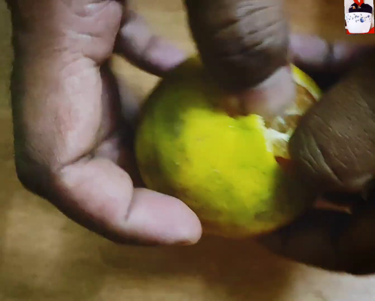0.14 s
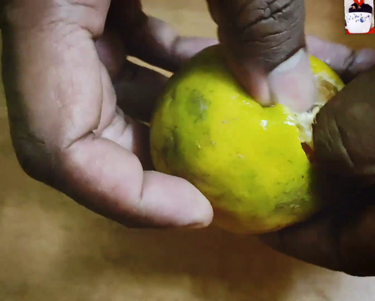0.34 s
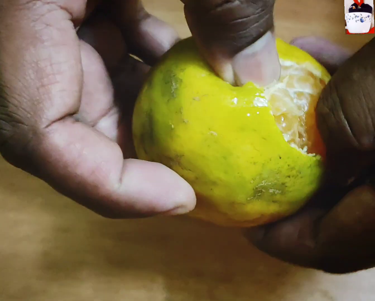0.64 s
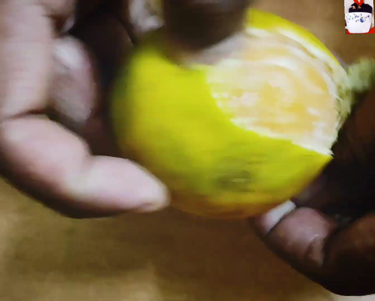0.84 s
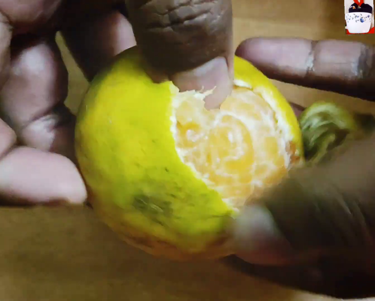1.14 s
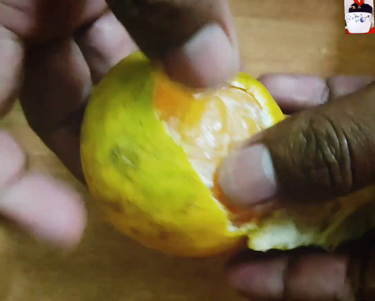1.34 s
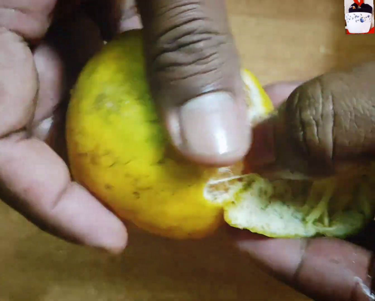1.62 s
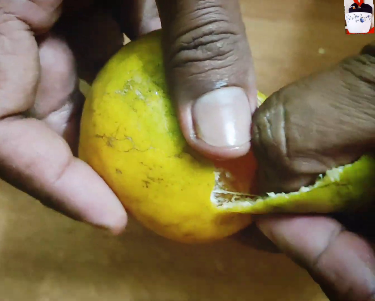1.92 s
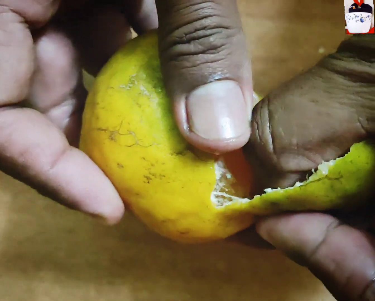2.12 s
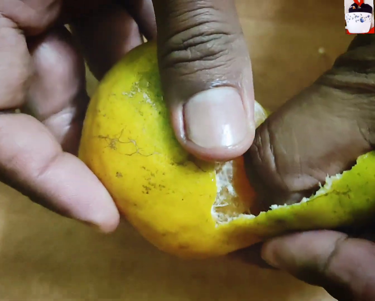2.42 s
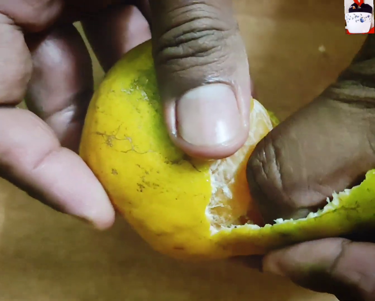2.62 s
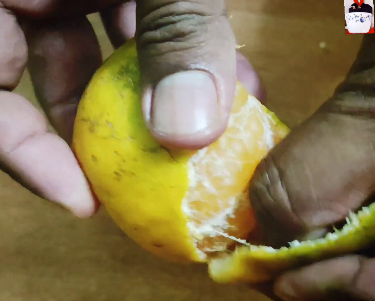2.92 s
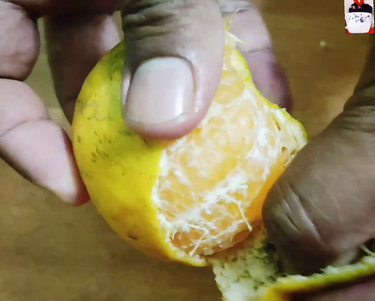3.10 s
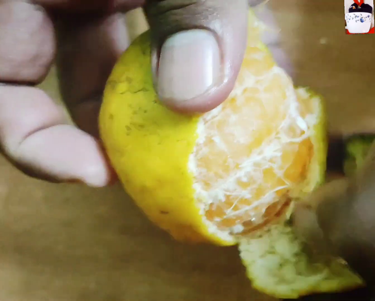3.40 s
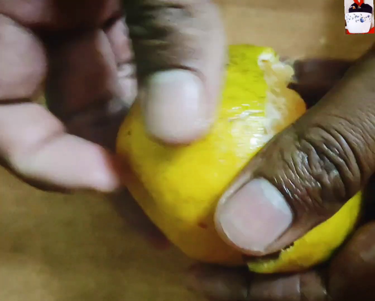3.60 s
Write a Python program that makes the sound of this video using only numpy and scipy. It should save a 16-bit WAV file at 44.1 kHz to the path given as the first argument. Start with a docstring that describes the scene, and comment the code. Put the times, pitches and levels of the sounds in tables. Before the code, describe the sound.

Rind pulled off an orange, close stereo microphone slightly favouring the left: faint rubbing first, small snaps, a brief dense tear midway, then grainy peeling with sharp ticks and a low hum.

```python
"""A low rumble and faint air come first, then fingers rub and press an orange with faint squeaks.
Pith fibres snap as single clicks with scatter, and the rind rips once in a dense, resonant crackle.
Then a strip pulls away as fine fizzing grains with sharp ticks, while a low sine hum swells.
Rubs are grainy noise, bumps are damped rings of fruit and hand, and a short room tail follows them all."""
import sys
import numpy as np
from scipy import signal
from scipy.fft import rfft, irfft, next_fast_len
from scipy.io import wavfile
from scipy.ndimage import map_coordinates

SR = 44100
rng = np.random.default_rng(int(sys.argv[2]) if len(sys.argv) > 2 else 0)


def output_pcm(signal):
    """Save a mono or channel-first signal as 16-bit PCM at the path in sys.argv[1].

    Samples are clipped to [-1, 1] before scaling.
    """
    pcm = np.clip(np.atleast_2d(signal).T, -1, 1) * 32767
    wavfile.write(sys.argv[1], SR, np.round(pcm).astype(np.int16))


N = 165375  # samples


def amp(db):
    """Decibels to gain."""
    return 10 ** (np.asarray(db) / 20)


def unit(x):
    """Scale to rms 1."""
    return x / np.sqrt(np.mean(x ** 2) + 1e-20)


def along(points, hz):
    """Read (frequency, value) points on a log frequency axis."""
    f, v = np.transpose(points)
    return np.interp(np.log(hz + 1), np.log(f + 1), v)


def level(rows):
    """Gain per sample from (time, level) rows, silent before and after."""
    s, db = np.transpose(rows)
    return amp(np.interp(np.arange(N) / SR, s, db, left=-np.inf, right=-np.inf))


def swell(centre, half):
    """A bell-shaped rise and fall; centre and half length in seconds."""
    return np.exp(-((np.arange(N) / SR - centre) / half) ** 2)


def wobble(rate):
    """A smooth random curve, rate knots a second."""
    knots = rng.standard_normal(int(N * rate / SR) + 4)
    return map_coordinates(knots, [np.arange(N) * rate / SR])


def filtered(x, response):
    """Shape x by a response of frequency."""
    m = next_fast_len(N + SR // 2)
    hz = np.fft.rfftfreq(m, 1 / SR)
    return irfft(rfft(x, m) * response(hz), m)[..., :N]


def coloured(pair, spectrum, alike, tilt_db=0):
    """Two unrelated signals become one stereo sound of rms 1; tilt is in dB per octave."""
    def response(hz):
        gain = amp(along(spectrum, hz) + tilt_db * np.log2(hz + 1))
        # the mid-side balance sets how alike left and right are
        turn = np.arccos(np.clip(along(alike, hz), -1, 1)) / 2
        return gain * [np.cos(turn), np.sin(turn)]

    mid, side = filtered(pair, response)
    return unit(np.array([mid + side, mid - side]))


def noise():
    """Two unrelated white noises."""
    return rng.standard_normal((2, N))


def grains(rate, spread_db, hiss):
    """Tiny ruptures at random moments, rate a second, sizes varied by spread_db, on a bed of hiss."""
    sizes = amp(spread_db * np.clip(rng.standard_normal(N), -2, 2))
    happens = rng.random(N) < rate / SR
    return unit(sizes * happens * noise()) + hiss * noise()


SNAP_TILT_DB = 0.2  # per octave


def pulse(hz, octaves, size=1024):
    """A causal minimum-phase click of peak 1 with a bell-shaped spectrum."""
    f = np.fft.rfftfreq(size, 1 / SR) + 1
    bell = np.exp(-(np.log2(f / hz) / (2 * octaves)) ** 2)
    gain = bell * amp(SNAP_TILT_DB * np.log2(f / hz + .5))
    # folding the cepstrum forward packs the energy at the start
    cepstrum = irfft(np.log(gain + .003))
    cepstrum[1:size // 2] *= 2
    cepstrum[size // 2:] = 0
    click = irfft(np.exp(rfft(cepstrum)))
    return click / np.abs(signal.hilbert(click)).max()


# fibres snapping: (time [s], click level before SNAP_DB [dB], centre [Hz], width [octaves])
FIBRE_SNAPS = [(1.3047, -42, 5100, 1.3), (1.6497, -44, 1510, 0.57), (1.6537, -44.5, 1570, 0.48),
               (1.7118, -37.5, 2630, 0.63), (1.7166, -30.5, 3070, 2.5), (1.7203, -41, 1960, 0.73),
               (1.8331, -29, 4400, 3.3), (1.8356, -36, 5100, 0.93), (1.84, -31, 5530, 0.94),
               (2.1631, -35.5, 2540, 1.42), (2.2649, -34.5, 3750, 1.4), (2.3136, -31, 2980, 0.93),
               (2.3261, -32, 7800, 0.33), (2.3502, -34, 1900, 0.24), (2.359, -20, 2240, 0.55),
               (2.3605, -45, 1920, 0.34), (2.3613, -16, 2100, 0.64), (2.3671, -21.5, 2160, 1.6),
               (2.3789, -18.5, 2200, 0.97), (2.3878, -10.5, 3700, 1.8), (2.397, -12.5, 2760, 2.9),
               (2.4061, -19, 3400, 2.7), (2.418, -26, 2430, 0.92), (2.4198, -22.5, 3420, 1.07),
               (2.5361, -40.5, 1640, 0.48), (2.7316, -34, 3730, 2.5), (2.7428, -32.5, 3320, 2.5),
               (2.7582, -28.5, 4440, 4), (3.1499, -48, 3140, 0.33), (3.2054, -36.5, 5000, 0.36),
               (3.2339, -26.5, 5860, 1.05), (3.2716, -37.5, 2960, 0.46), (3.2768, -23.5, 2540, 0.82),
               (3.3053, -36.5, 3700, 0.9), (3.3329, -28.5, 4770, 0.64), (3.4268, -13, 6000, 1.33),
               (3.4622, -31.5, 3340, 0.59), (3.5098, -35.5, 2500, 0.99), (3.5859, -34, 3430, 0.82),
               (3.6056, -35, 2700, 1.3), (3.651, -34, 2700, 0.69), (3.7075, -26, 3170, 0.61),
               (3.7244, -38, 3550, 0.36)]
SNAP_DB, SNAP_LEAD_S = 2, .0001  # added strength of every snap; start ahead of the listed time
SCATTER_DB, SCATTER_T60_S = -3.5, .006  # bounces between hands and fruit


def snaps():
    """Each fibre breaks with one click, followed by a few milliseconds of scatter."""
    out, t = np.zeros((2, N + SR)), np.arange(SR // 40) / SR
    for s, db, hz, octaves in FIBRE_SNAPS + small_fibres():
        # scatter waits 0.3 ms, and each side hears some of the other
        paths = rng.standard_normal((2, len(t))) * amp(-60 * t / SCATTER_T60_S) * (t > .0003)
        paths = paths + paths[::-1] / 2
        paths *= amp(SCATTER_DB) / np.linalg.norm(paths, axis=1, keepdims=True)
        paths[:, 0] = 1  # the direct click
        sound = signal.fftconvolve(paths, pulse(hz, octaves)[None], axes=1)
        start = round((s - SNAP_LEAD_S) * SR)
        out[:, start:start + sound.shape[1]] += amp(db + SNAP_DB) * sound
    return out[:, :N]


# the rind tearing: (time [s], level [dB])
RIP_LEVEL = [(2.295, -63.5), (2.322, -52), (2.342, -46.5), (2.361, -28), (2.373, -41), (2.39, -37.5),
             (2.417, -44.5), (2.432, -50.5), (2.48, -75)]
# resonances of the rind: (frequency [Hz], relative level [dB])
RIND_COLOUR = [(100, -4), (250, -14.5), (570, -6.5), (850, -14), (1250, -14.5), (1670, -1.5), (1950, -3),
               (2270, -4), (2900, -9), (3700, -12.5), (4040, -7.5), (4700, -15.5), (5700, -8.5),
               (7500, -10.5), (11000, -21.5)]
# stereo width of rip, pith and rubs: (frequency [Hz], left-right likeness [1 = same])
FRUIT_ALIKE = [(100, 1), (1500, 0.83), (3000, 0.53), (5000, 0.31), (10000, 0.07)]
RIP_OPEN_S, RIP_OPENING_S, RIP_DULL_DB = 2.358, 0.0068, -3  # moment, speed; slope per octave before


def rip():
    """The rind tears through: a dense crackle in its own resonances, muffled until the tear opens."""
    crackle = grains(2500, spread_db=0.0, hiss=0.66)
    opened = (1 + np.tanh((np.arange(N) / SR - RIP_OPEN_S) / RIP_OPENING_S)) / 2
    bright = coloured(crackle, RIND_COLOUR, FRUIT_ALIKE)
    dull = coloured(crackle, RIND_COLOUR, FRUIT_ALIKE, tilt_db=RIP_DULL_DB)
    return level(RIP_LEVEL) * (opened * bright + (1 - opened) * dull)


# the strip pulling away: (time [s], level [dB])
PEEL_LEVEL = [(3.08, -70), (3.16, -63), (3.22, -58.5), (3.3, -55.5), (3.45, -58.5), (3.62, -56.5),
              (3.69, -59.5), (3.75, -56)]
# pith giving way briefly: (centre [s], half length [s], level [dB])
PITH_GIVES = [(1.623, 0.031, -61.5), (1.684, 0.041, -61), (1.713, 0.0044, -51), (1.841, 0.026, -56.5),
              (1.935, 0.021, -62.5), (2.588, 0.031, -61.5), (2.901, 0.073, -62.5)]
# colour of parting pith: (frequency [Hz], relative level [dB])
PITH_COLOUR = [(200, 2.5), (800, -3), (1250, -0.5), (3500, 1.5), (9000, -1), (11000, -4)]


def pith():
    """Pith parts from the flesh as grainy noise: short gives, then one long fizzing pull."""
    gives = sum(amp(db) * swell(s, half) for s, half, db in PITH_GIVES)
    short = gives * coloured(grains(900, spread_db=0, hiss=1), PITH_COLOUR, FRUIT_ALIKE)
    fizz = coloured(grains(1000, spread_db=0, hiss=1), PITH_COLOUR, FRUIT_ALIKE)
    return short + level(PEEL_LEVEL) * fizz


# typical pitch; level over the fizz, before SNAP_DB
TICK_COUNT, TICK_HZ, TICK_OVER_DB = 45, 3570, 8.5


def small_fibres():
    """Tiny fibres break at random pitch and strength in the pull, as rows like FIBRE_SNAPS."""
    s = rng.uniform(PEEL_LEVEL[1][0], PEEL_LEVEL[-1][0], size=TICK_COUNT)
    fizz_db = np.interp(s, *np.transpose(PEEL_LEVEL))
    db = fizz_db + TICK_OVER_DB + rng.normal(0, 1.8, len(s))
    return [(at, peak, TICK_HZ * np.exp(rng.normal(0, 0.6)), .5) for at, peak in zip(s, db)]


# fingers rubbing: (centre [s], half length [s], level [dB], brightness [dB per octave])
FINGER_RUBS = [(.443, .006, -52.5, .5), (.96, .06, -68.5, .7), (1.078, .04, -55, .4),
               (1.13, .04, -57.5, .4), (1.651, .007, -56, 3), (2.533, .0075, -49.5, 1.7)]
# colour of skin on rind: (frequency [Hz], relative level [dB])
SKIN_COLOUR = [(80, -9), (160, -2), (235, 10), (380, -9.5), (700, -4.5), (1300, -7.5), (2500, -15.5),
               (5000, -23.5), (11000, -33)]


def fingers():
    """Skin slips over the rind with a dull, finely grainy rub."""
    out = np.zeros((2, N))
    for s, half, db, tilt in FINGER_RUBS:
        slips = grains(3000, spread_db=2.5, hiss=.45)
        out += amp(db) * swell(s, half) * coloured(slips, SKIN_COLOUR, FRUIT_ALIKE, tilt_db=tilt)
    return out


# soft bumps of fingers and rind: (time [s], strength before BUMP_DB [dB])
SOFT_BUMPS = [(.439, -42.5), (.833, -50.5), (1.644, -51), (1.713, -53), (1.837, -47), (2.529, -49)]
# fruit in the cupped hand: (typical mode [Hz], typical level [dB], decay t60 [s])
BODY_MODES = [(159, -5, 0.058), (259.4, 4, 0.046), (542, -5.5, 0.045), (900, 0, 0.011)]
BUMP_DB, BUMP_ATTACK_S = -5, .001


def bumps():
    """Each bump rings the soft, heavily damped body of fruit and hand, varied a little each time."""
    out, t = np.zeros(N + SR), np.arange(SR // 8) / SR
    for s, db in SOFT_BUMPS:
        ring = np.zeros(len(t))
        for hz, gain, t60 in BODY_MODES:
            decay = amp(gain + rng.normal(0, 3.7) - 60 * t / t60)
            pitch = hz * np.exp(rng.normal(0, 0.045))
            ring += decay * np.sin(2 * np.pi * pitch * t)
        attack = 1 - np.exp(-t / BUMP_ATTACK_S)
        out[round(s * SR):][:len(t)] += amp(db + BUMP_DB) * ring * attack
    return out[:N]


# faint high squeaks: (centre [s], half length [s], pitch [Hz], level [dB])
FAINT_SQUEAKS = [(.66, .25, 2130, -82), (.55, .08, 2480, -83), (.6, .1, 5750, -80), (.94, .06, 5520, -80),
                 (1.11, .06, 5540, -80.5), (.97, .12, 9960, -76.5)]
SQUEAK_WIDTH, SQUEAK_DRIFT, SQUEAK_BREAK_DB = .04, .006, 3.5  # width and drift are shares of pitch


def squeaks():
    """Narrow bands of noise on a drifting pitch, broken up by an uneven level."""
    out = np.zeros(N)
    for s, half, hz, db in FAINT_SQUEAKS:
        phase = 2 * np.pi * np.cumsum(hz * (1 + SQUEAK_DRIFT * wobble(19))) / SR
        width = SQUEAK_WIDTH * hz
        band = wobble(width) * np.cos(phase) + wobble(width) * np.sin(phase)
        out += amp(db) * swell(s, half) * unit(band * amp(SQUEAK_BREAK_DB * wobble(19.1)))
    return out


# short decay: (frequency [Hz], decay t60 [s])
ROOM_DECAY = [(200, 0.29), (2000, 0.2), (10000, 0.16)]
ROOM_DB = -15


def room(x):
    """A short tail of decaying noise whose treble dies first."""
    hz, t, z = signal.stft(rng.standard_normal((2, SR // 2)), SR, nperseg=256)
    decay = amp(-60 * t / along(ROOM_DECAY, hz)[:, None])
    tail = signal.istft(z * decay, SR, nperseg=256)[1]
    return signal.fftconvolve(x, tail / np.linalg.norm(tail[0]), axes=1)[:, :N]


# effort of the hands: (time [s], rumble level over RUMBLE_DB [dB])
GRIP_EFFORT = [(0, -7.5), (.16, -0.5), (.35, 2.5), (.54, -5.5), (.72, 3), (1.01, -0.5), (1.3, -3.5),
               (1.52, -2.5), (1.8, 3), (2.37, 1.5), (3.05, -2)]
# colour of the rumble: (frequency [Hz], relative level [dB])
RUMBLE_COLOUR = [(1, 8), (3, 21), (22, 1), (36, -13.5), (52, -1), (75, -16.5), (125, -22), (170, -37.5),
                 (300, -60)]
# grip shifting: (centre [s], half length [s], level before the left-right balance [dB])
GRIP_SHIFTS = [(0.668, .05, -63), (1.82, 0.031, -62), (1.93, 0.019, -70), (2.688, 0.042, -65)]
# colour of the thrum: (frequency [Hz], relative level [dB])
THRUM_COLOUR = [(60, -24), (125, -5), (220, -27), (1500, -68)]
# stereo width of rumble and thrum: (frequency [Hz], left-right likeness [1 = same])
LOW_ALIKE = [(40, 0.87), (130, 1)]
RUMBLE_DB = -39.5


def grip():
    """The hands rumble as they work the fruit and thrum where they shift: low filtered noise."""
    effort = amp(RUMBLE_DB + np.interp(np.arange(N) / SR, *np.transpose(GRIP_EFFORT)))
    rumble = effort * coloured(noise(), RUMBLE_COLOUR, LOW_ALIKE)
    shifts = sum(amp(db) * swell(s, half) for s, half, db in GRIP_SHIFTS)
    return rumble + shifts * coloured(noise(), THRUM_COLOUR, LOW_ALIKE)


# hum swelling near the end: (time [s], level before the left-right balance [dB])
HUM_LEVEL = [(3.15, -53), (3.26, -49.5), (3.38, -44.5), (3.5, -48), (3.64, -53), (3.72, -55)]
HUM_HZ = 49


def hum():
    """A steady low sine that swells and fades by its level curve."""
    return level(HUM_LEVEL) * unit(np.sin(2 * np.pi * HUM_HZ * np.arange(N) / SR))


# colour of the air: (frequency [Hz], relative level [dB])
AIR_COLOUR = [(88, -47), (150, -14), (173, -7), (600, -16), (1730, -19), (2260, -22), (8710, -25),
              (11000, -26.5), (14300, -120)]
# stereo width of the air: (frequency [Hz], left-right likeness [1 = same])
AIR_WIDTH = [(200, 0.73), (1000, 0.52), (4000, 0.044), (10000, 0.24)]
AIR_DB, FLUTTER_DB, FLUTTER_PER_S = -67, 1.64, 51  # typical level; flutter depth; knots a second


def air():
    """Faint filtered noise with a slight random flutter in level."""
    flutter = amp(AIR_DB + FLUTTER_DB * wobble(FLUTTER_PER_S))
    return flutter * coloured(noise(), AIR_COLOUR, AIR_WIDTH)


LEFT_DB, AIR_LEFT_DB = 3.5, 1.5  # left over right


def background():
    """Air, hand rumble and hum, each louder on the left."""
    sides = np.array([[1], [-1]])
    return air() * amp(AIR_LEFT_DB / 2 * sides) + (grip() + hum()) * amp(LEFT_DB / 2 * sides)


# stereo balance of the fruit: (frequency [Hz], left over right [dB])
FRUIT_BALANCE = [(100, 6.5), (350, 2.5), (620, 0), (1100, 6.5), (3500, 2), (11000, 1)]
PORT_LAG_S = .00004  # right is later


def scene():
    """The fruit is held a little nearer the left microphone."""
    sides = np.array([[1], [-1]])

    def placement(hz):
        lag = np.exp(1j * np.pi * hz * PORT_LAG_S * sides)
        return lag * amp(along(FRUIT_BALANCE, hz) * sides / 2)

    fruit = filtered(snaps() + rip() + pith() + fingers() + bumps(), placement)
    return fruit + amp(ROOM_DB) * room(fruit) + background() + squeaks()


TOP_HZ = 10950


def record(dry):
    """The band limit: treble falls steeply above TOP_HZ, 1 dB every 22 Hz over 3 kHz."""
    return filtered(dry, lambda hz: amp(-np.clip(hz - TOP_HZ, 0, 3000) / 22))


dry = scene()
out = record(dry)
output_pcm(out)
```